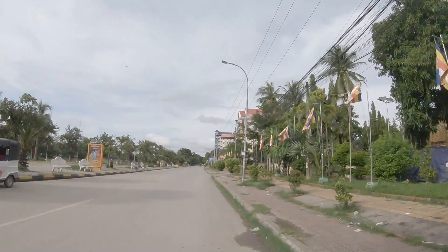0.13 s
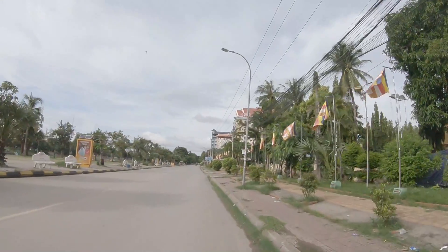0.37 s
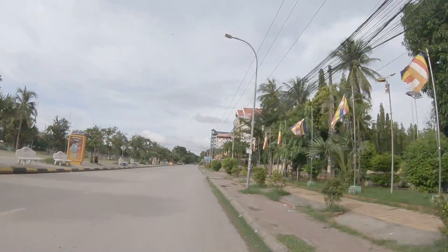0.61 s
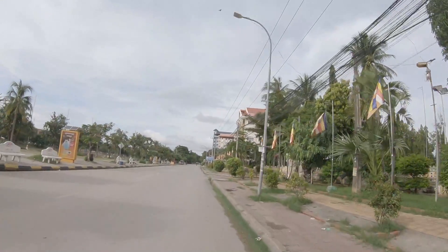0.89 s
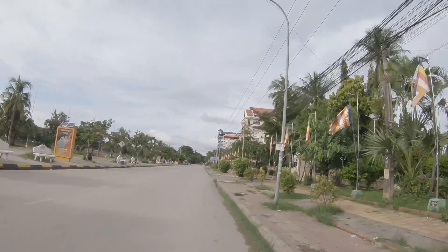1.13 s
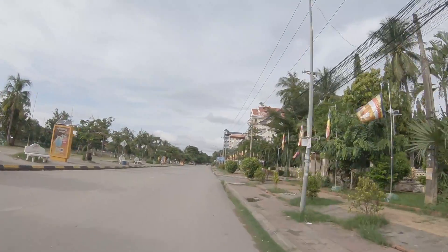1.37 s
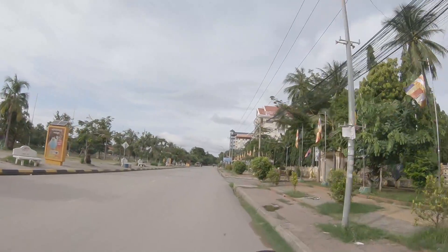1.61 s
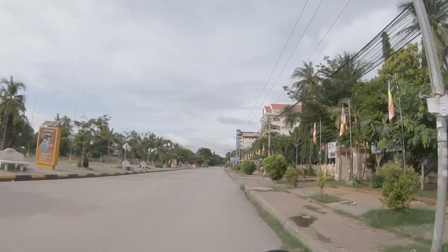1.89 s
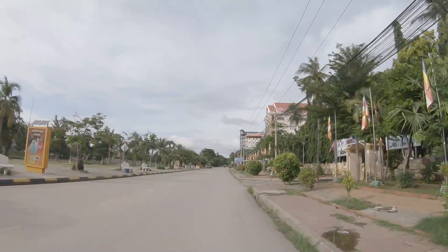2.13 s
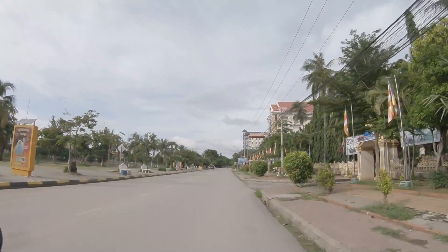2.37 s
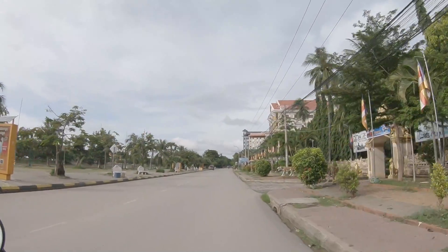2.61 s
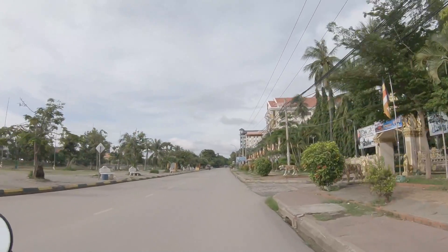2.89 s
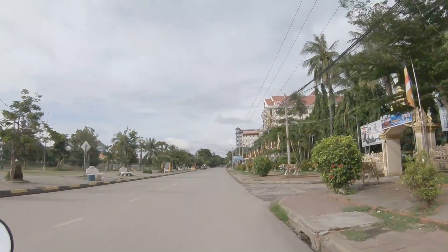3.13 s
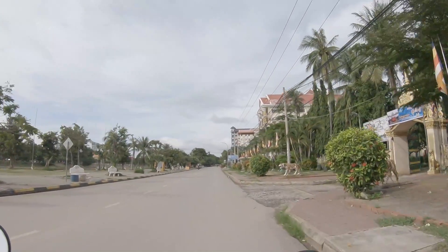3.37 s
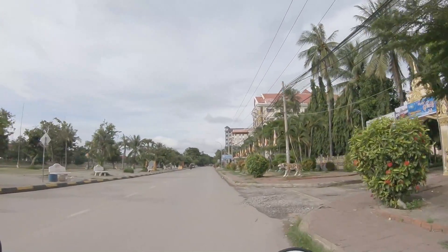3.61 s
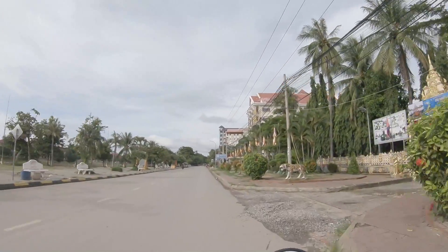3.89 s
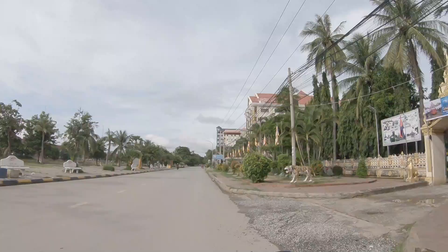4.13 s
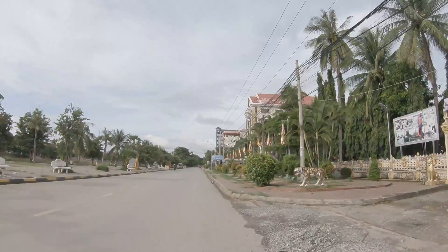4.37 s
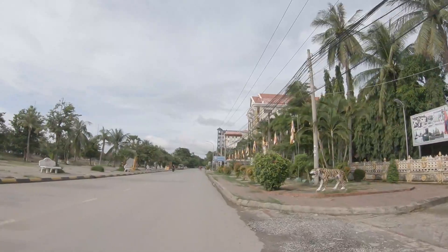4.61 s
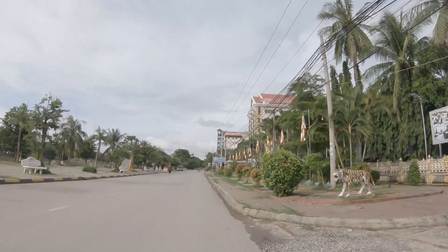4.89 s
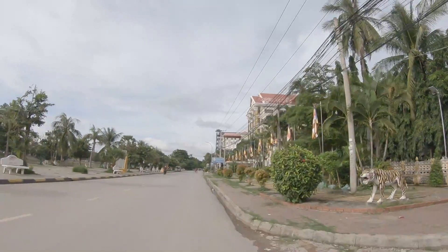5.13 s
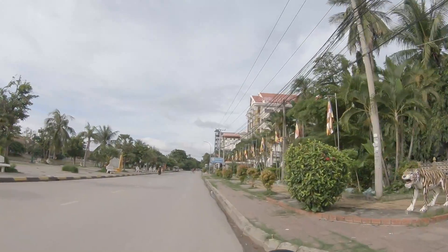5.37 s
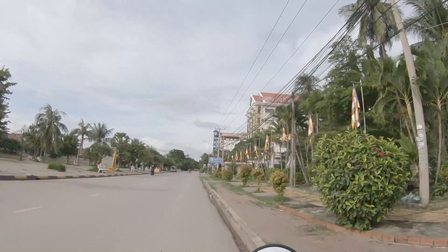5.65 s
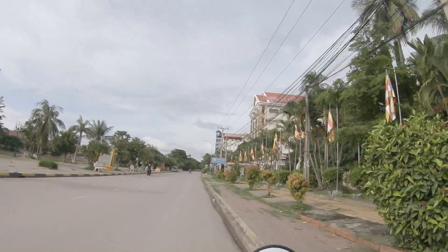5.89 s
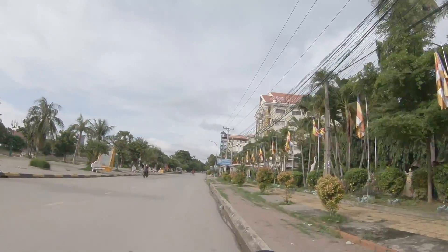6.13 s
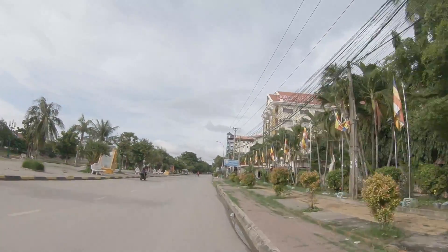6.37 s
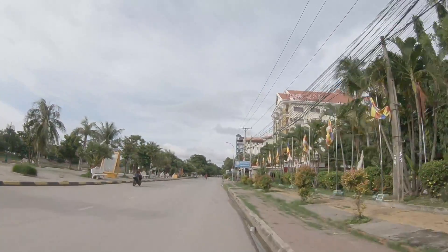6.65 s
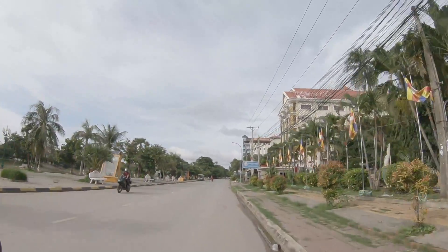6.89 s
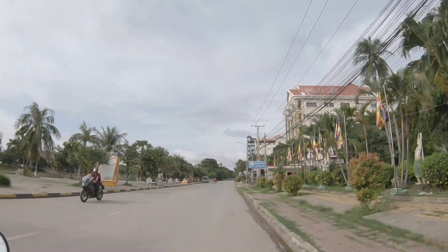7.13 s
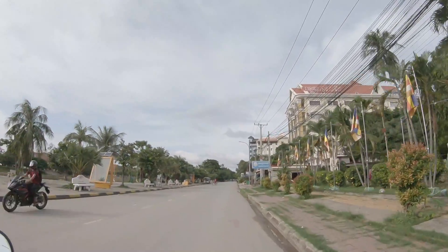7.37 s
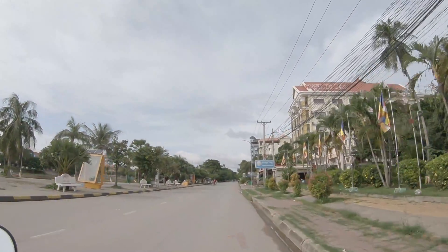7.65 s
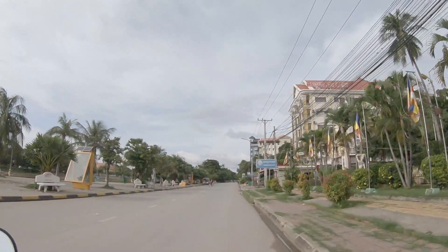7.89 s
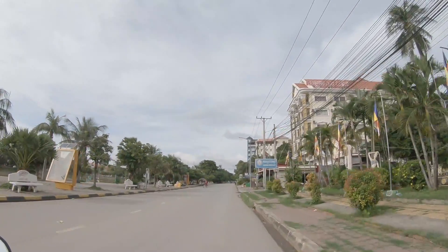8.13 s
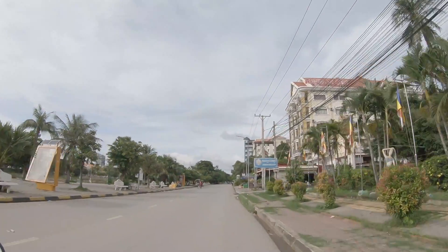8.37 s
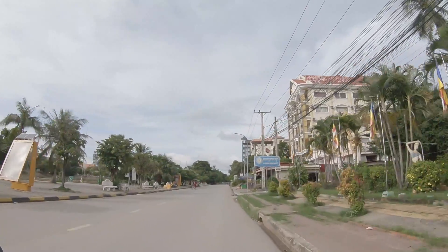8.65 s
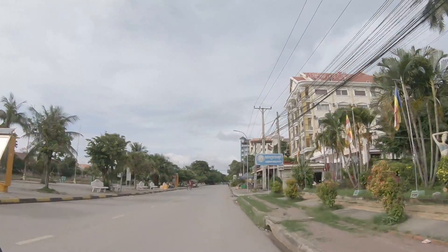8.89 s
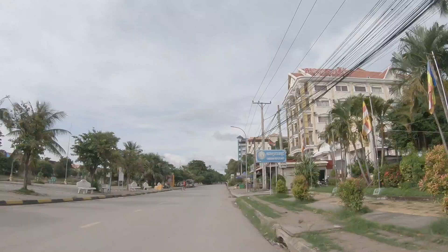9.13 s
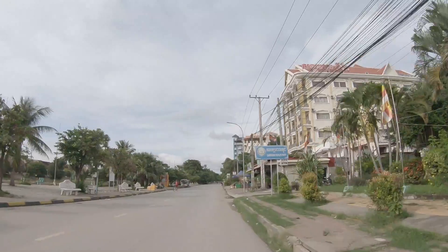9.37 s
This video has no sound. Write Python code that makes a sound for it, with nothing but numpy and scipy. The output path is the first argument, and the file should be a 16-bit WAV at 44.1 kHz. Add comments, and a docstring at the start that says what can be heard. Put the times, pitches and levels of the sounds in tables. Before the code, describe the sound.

Riding a small single-cylinder motorbike: low throbbing drone, rumbling wind gusts, rough tyre noise, and another motorbike hissing softly past late on.

```python
"""Riding a small motorcycle

A small single-cylinder four-stroke runs down a wide, quiet road, slowly gaining speed. Harmonics of the
firing rate form its exhaust drone; gears whine as smeared lines, and shaped noise makes the ticking
valves, cylinder raps and tyre roar, all of it coloured by the resonances of the frame. Gusts of noise and
single pulses buffet the microphone, two faint chirps sound, and a motorbike hisses past the other way."""
import sys
import numpy as np
from scipy import signal
from scipy.fft import rfft, irfft, next_fast_len
from scipy.io import wavfile
from scipy.ndimage import uniform_filter1d, map_coordinates

SR = 44100
rng = np.random.default_rng(int(sys.argv[2]) if len(sys.argv) > 2 else 0)


def convert_level_to_amplitude(level_db):
    """Map a level in decibels to its linear amplitude factor."""
    exponent = np.asarray(level_db, float) / 20
    return 10 ** exponent


def log_audio(samples):
    """Write samples as a 16-bit WAV file to the path given in sys.argv[1]."""
    # one column per channel
    frames = np.atleast_2d(samples).T
    # limit to full scale, then quantise
    limited = np.clip(frames, -1, 1)
    pcm = np.round(limited * 32767).astype(np.int16)
    wavfile.write(sys.argv[1], SR, pcm)


N = 419391
TIME_S = np.arange(N) / SR

# Course of the engine and its first gear pair: time_s, firing_hz, tooth_contact_hz
ENGINE_SPEED = [(0, 21.3, 627), (1, 21.5, 628.4), (2.3, 21.58, 632), (3, 21.98, 633), (4, 22.24, 640),
                (5.5, 22.62, 651), (7, 22.86, 668), (8, 22.96, 678), (9.51, 22.9, 684)]


def unit(x):
    """Normalisation to equal power: scales x to rms 1."""
    return x / np.sqrt(np.mean(x ** 2) + 1e-20)


def curves(rows):
    """Linear interpolation in time: one value per sample for each column after the time."""
    time_s, *columns = np.transpose(rows)
    return [np.interp(TIME_S, time_s, column) for column in columns]


def wobble(rate_hz):
    """Slow random modulation: a smooth curve through rate_hz random knots a second."""
    coarse = np.arange(0, N + 32, 32)
    knots = rng.standard_normal(int(N * rate_hz / SR) + 4)
    return np.interp(np.arange(N), coarse, map_coordinates(knots, [coarse * rate_hz / SR]))


def filtered(x, response):
    """Linear filtering: multiplies the spectrum of x by a complex response of frequency."""
    m = next_fast_len(N + 8192)
    return irfft(rfft(x, m) * response(np.fft.rfftfreq(m, 1 / SR)), m)[:N]


def rush(spectrum, patchy_db):
    """Turbulent noise of rms 1: a shaped spectrum whose gain varies at random over time and frequency."""
    cells = signal.stft(rng.standard_normal(N + 512), nperseg=512)[2]
    field = uniform_filter1d(rng.standard_normal(cells.shape), size=6, axis=0)
    field = uniform_filter1d(field, size=12, axis=1)
    x = signal.istft(cells * convert_level_to_amplitude(patchy_db * unit(field)), nperseg=512)[1][:N]
    f, db = np.transpose(spectrum)
    return unit(filtered(x, lambda hz: convert_level_to_amplitude(np.interp(np.log(hz + 1), np.log(f + 1), db))))


def swells(rows):
    """Superposed bell-shaped rises in dB, quicker up than down; one sum per column after the first two."""
    rise_share = 0.85  # length of the rise as a share of the fall
    total = 0
    for time_s, half_s, *db in rows:
        length_s = np.where(TIME_S < time_s, rise_share * half_s, half_s)
        total = total + np.outer(db, np.exp(-((TIME_S - time_s) / length_s) ** 2))
    return total


def with_speed(cruise_db, db_per_hz):
    """Linear dependence on engine speed: a value at cruise and its change per extra firing a second."""
    cruise_hz = 22.3
    return cruise_db + db_per_hz * (curves(ENGINE_SPEED)[0] - cruise_hz)


def once_a_cycle(cycles, at, sharp):
    """Periodic excitation: a bump of height 1 at one point of every engine cycle."""
    return np.exp(sharp * (np.cos(2 * np.pi * (cycles - at)) - 1))


def frame(x):
    """Modal resonance: the plain path plus the ringing of frame and panels."""
    # Modes of frame and panels: centre_hz, width_hz, peak_db over the plain path
    modes = [(637, 8.5, -6.5), (717, 28, -8), (835, 25, -11.5), (940, 20, -6.5), (1049, 19, -4),
             (1095, 40, -2), (1150, 34, -3.5), (1270, 31, -7), (1398, 15, -6.5), (1544, 49, -7.5),
             (1742, 39, -5.5), (1875, 24, -9), (1988, 18, -9.5), (2181, 29, -7), (4520, 200, -6),
             (8100, 74, -2)]

    def response(f):
        total = 1
        for c, w, db in modes:
            total = total + convert_level_to_amplitude(db) * 1j * f * w / (c * c - f * f + 1j * f * w)
        return total

    return filtered(x, response)


def chirps():
    """Frequency modulation under a Gaussian envelope: two short chirps, gliding down as they pass."""
    # Chirps: centre_s, peak_db, centre_hz
    chirp_rows = [(1.043, -54, 2690), (4.635, -54, 2750)]
    out, t = np.zeros(N + SR), np.arange(-1500, 1500) / SR
    for centre_s, db, hz in chirp_rows:
        chirp = np.exp(-(t / 0.014) ** 2) * np.sin(2 * np.pi * hz * t * (1 - .6 * t))
        start = round((centre_s + t[0]) * SR)
        out[start:][:len(t)] += convert_level_to_amplitude(db) * chirp
    return out[:N]


def motorbike():
    """Attenuation with distance: chain and tyre hiss, brightest from the rear, just after it passes."""
    # Chain and tyre hiss: frequency_hz, density_db (relative, per Hz)
    hiss_spectrum = [(900, -120), (2400, 4.5), (3400, -8.5), (4300, 4), (4600, 6.5), (5200, 1), (5800, 3),
                     (6150, 7.5), (6450, -1.5), (6800, -4), (9000, -11), (10200, -18), (11200, -37),
                     (13000, -120)]
    closest_s, closing_speed_m_s, gap_m, level_db = 7.5, 16, 6.8, -48.2
    rear_delay_s, shade_delay_s = .12, .37  # the rider's body then shades the sound

    def nearness(at_s):
        return np.hypot(1, (TIME_S - at_s) * closing_speed_m_s / gap_m) ** -2

    unshaded = (1 - np.tanh((TIME_S - closest_s - shade_delay_s) / .18)) / 2
    hiss = rush(hiss_spectrum, patchy_db=.7)
    top = filtered(hiss, lambda hz: np.clip((hz - 6600) / 1200, 0, 1))
    passing = nearness(closest_s) * (hiss - top) + nearness(closest_s + rear_delay_s) ** 3 * top
    return convert_level_to_amplitude(level_db + .9 * wobble(30)) * unshaded * passing


def wind():
    """Turbulent pressure on the port: eddies buffet, their edges flutter, the hardest land as thumps."""
    # Low buffeting: frequency_hz, density_db (relative, per Hz)
    buffet_spectrum = [(8, -41.5), (16, -14.5), (26, -7), (36, 2.5), (45, 2), (75, 0), (112, 1), (139, -7),
                       (170, -16), (220, -19), (370, -120)]
    # Faster edges of the eddies: frequency_hz, density_db (relative, per Hz)
    flutter_spectrum = [(40, -120), (82, -24), (140, -3), (238, -10.5), (378, -17), (600, -22.5),
                        (1200, -44), (2000, -62), (3000, -120)]
    # Gusts: centre_s, half_length_s, buffet_rise_db, flutter_rise_db
    gust_rows = [(.18, 0.04, 3, 8), (.36, 0.048, 0.5, 2.5), (.69, 0.13, 3.5, 6.5), (.88, 0.11, 9, 5.5),
                 (1.2, 0.15, 4.5, 2.5), (1.7, 0.12, 5, 3), (1.76, 0.084, 3.5, 8.5), (2.05, 0.25, 5.5, -1),
                 (2.17, 0.045, -3, 5), (2.48, 0.075, 1.5, 1.5), (3.15, 0.13, 2.5, -5),
                 (3.65, 0.11, 3.5, -1), (4.88, 0.062, 7.5, 4), (5.5, 0.13, 1.5, -2), (5.95, 0.12, 3.5, 6.5),
                 (6.3, 0.1, 1, 5), (6.6, 0.13, 5.5, 3.5), (6.95, 0.11, 4, 2), (7.2, 0.14, 3.5, 3.5),
                 (7.5, .1, 4.5, 1), (8, .1, 5.5, 1), (8.9, 0.064, 2, 2.5)]
    # Single hard eddies: centre_s, peak_db, direction (push +1 or pull -1), length_s
    thump_rows = [(.657, -19, -1, .003), (.73, -15, 1, .0028), (.85, -15, -1, .0036), (.91, -17, -1, .0036),
                  (1.696, -18, -1, .004), (1.716, -16, 1, .0048)]
    steady_buffet_db, steady_flutter_db, eddy_swing_db = -28.5, -38.5, 0.4
    ragged = .1  # dB of quick tearing per dB of gust

    buffet_db, flutter_db = swells(gust_rows) + eddy_swing_db * wobble(8.7)
    buffet_level = convert_level_to_amplitude(steady_buffet_db + buffet_db + 0.87 * wobble(20))
    buffet = buffet_level * rush(buffet_spectrum, patchy_db=0.0)
    flutter_level = convert_level_to_amplitude(steady_flutter_db + flutter_db * (1 + ragged * wobble(35)))
    lumps = convert_level_to_amplitude(1.7 * wobble(28))
    flutter = flutter_level * unit(lumps * rush(flutter_spectrum, patchy_db=0.0))
    thumps = np.zeros(N)
    for centre_s, db, sign, length_s in thump_rows:
        u = (TIME_S - centre_s) / length_s
        thumps += sign * convert_level_to_amplitude(db) * (1 - u ** 2) * np.exp(-u ** 2 / 2)
    return buffet + flutter + thumps


def tyres(cycles):
    """Contact noise and cavity resonance: rubber roars on coarse tar, the hollow tyre booms in a narrow band."""
    # Roar of the tread: frequency_hz, density_db (relative, per Hz)
    roar_spectrum = [(240, -32.5), (400, -3), (628, 0), (874, -4), (1050, -5), (1330, -8.5), (1460, -7.5),
                     (2150, -15.5), (3220, -26), (3600, -29.5), (4680, -50), (7920, -120)]
    # Boom of the hollow tyre: frequency_hz, density_db (relative, per Hz)
    boom_spectrum = [(200, -120), (400, -32.5), (480, 2.5), (560, 2.5), (620, 7), (760, -24), (1400, -120)]
    # Patches of rougher or smoother tar: centre_s, half_length_s, boom_rise_db, roar_rise_db
    patch_rows = [(.05, 0.21, 7.5, 2), (.6, 0.22, 11, 1.5), (1.05, 0.28, 3.5, 0), (3.3, 0.2, 16.5, 0.5),
                  (3.95, .12, 11, -0.5), (4.3, .1, 7, 0.5), (4.75, .3, 9, -0.5), (5.4, 0.27, 14.5, 0),
                  (5.92, 0.13, 3.5, -0.5), (7.5, 0.18, 2.5, -1), (8.2, 0.24, 8, -1), (9.15, 0.53, 15, 0)]
    quiet_boom_db = -57.5

    throb = 1 + 0.14 * once_a_cycle(cycles, at=0.043, sharp=3.5)  # each firing jolts the tyre
    boom_db, roar_db = swells(patch_rows)
    flicker_db = (0.4 + 0.11 * np.abs(roar_db)) * wobble(30)
    roar_level = convert_level_to_amplitude(with_speed(-41, 1.7) + roar_db + 0.2 * wobble(3.5) + flicker_db)
    roar = roar_level * unit(throb * rush(roar_spectrum, patchy_db=-0.2))
    boom_level = convert_level_to_amplitude(quiet_boom_db + boom_db + .8 * wobble(30))
    return roar + boom_level * rush(boom_spectrum, patchy_db=0.5)


def knock(cycles):
    """Impact excitation: each firing raps the cylinder with a short burst, each of its own strength."""
    # Ringing of the cylinder: frequency_hz, density_db (relative, per Hz)
    cylinder_spectrum = [(900, -120), (1600, -30), (2000, -9), (2170, 0), (2330, -14), (2900, -20),
                         (3300, -36), (5000, -120)]
    # How hard the firings rap: time_s, rap_db
    rap_rows = [(0, -3), (.9, -2.5), (1.35, 2.5), (1.7, -2), (2.8, 1), (3.4, 0.5), (4.3, 1), (4.6, -7),
                (5, -1), (6, 1), (7.3, 2), (8.8, 2), (9.51, -7)]
    rap = once_a_cycle(cycles, at=0, sharp=1.5) * convert_level_to_amplitude(1.2 * wobble(22))
    level = convert_level_to_amplitude(with_speed(-64, -6.5) + curves(rap_rows)[0])
    return level * unit(rap * rush(cylinder_spectrum, patchy_db=-1.0))


def clatter(cycles):
    """Periodically modulated noise: chain and valve hiss, ticking at each firing and at the quarter cycles."""
    # Chain and valve hiss: frequency_hz, density_db (relative, per Hz)
    clatter_spectrum = [(1000, -120), (1800, -21.5), (3000, -6), (3350, -9), (3700, 2.5), (4100, 1),
                        (4500, 1.5), (5400, 1), (6000, -1), (7000, -9), (8400, -10), (9500, -22.5),
                        (11200, -36.5), (11700, -35.5), (13500, -120)]
    # Faint topmost fizz: frequency_hz, density_db (relative, per Hz)
    fizz_spectrum = [(9000, -120), (11500, -4.5), (12100, 5), (13500, 4), (15000, -3.5), (15900, -12)]
    # Spells of fizz: start_s, end_s, level_db, fade_s
    spell_rows = [(-.5, .72, -83.5, .05), (3.4, 6.08, -82.5, .1), (3.2, 10, -91, .1), (8.45, 11, -80, .25),
                  (9.2, 11, -79, .15)]

    def fade(at_s, fade_s):
        return (1 + np.tanh((TIME_S - at_s) / fade_s)) / 2

    spells = np.zeros(N)
    for start_s, end_s, db, fade_s in spell_rows:
        spells += convert_level_to_amplitude(db) * (fade(start_s, fade_s) - fade(end_s, fade_s))
    tick = once_a_cycle(cycles, at=0, sharp=6.4) * convert_level_to_amplitude(1.1 * wobble(22))
    valves = once_a_cycle(4 * cycles, at=0, sharp=0.44) * convert_level_to_amplitude(5.3 * wobble(60))
    hiss = rush(clatter_spectrum, patchy_db=0.9)
    bright = filtered(hiss, lambda hz: np.clip((hz - 6000) / 2500, 0, 1))  # the ticks show most in the top
    body = unit(hiss * (1 + .35 * tick + 0.2 * valves) + bright * (0.34 * tick + 0.12 * valves))
    fizz = unit(rush(fizz_spectrum, patchy_db=1.5) * (1 + .8 * tick))
    return convert_level_to_amplitude(with_speed(-54.5, 1.4) + 0.16 * wobble(10)) * body + spells * fizz


def gears(cycles):
    """Tooth-mesh tones: contacts sing smeared lines, jolted by the torque kick of each firing."""
    # Gear pairs: ratio to the first pair's contact rate, cruise_db, db_per_hz of firing rate, smear_hz,
    # steady (clean part against smear, at cruise), steady_per_hz of firing rate
    pair_rows = [(.998, -50.5, 1.9, 65, .65, .4), (1.66, -57.5, 0, 110, .45, -.3),
                 (2.23, -57.5, 5.5, 55, .9, .7)]
    # Load on the gears: time_s, load_db
    load_rows = [(0, 4), (.6, -8), (1.2, -10.5), (2, -14), (2.7, 0), (3.6, 2), (4.2, 4), (5.6, 1.5),
                 (6.3, -1), (7.1, -5), (7.6, 1.5), (8.1, 4.5), (8.8, 5), (9.51, 4)]
    load_shares = (1.36, .2, 0.2)  # how far each pair follows the load
    waver_db = 0.5

    kick = 1 + .25 * once_a_cycle(cycles, at=0.25, sharp=1.3)
    mesh_hz, load_db = curves(ENGINE_SPEED)[1], curves(load_rows)[0]
    out = np.zeros(N)
    for (ratio, cruise_db, db_per_hz, smear_hz, steady, steady_per_hz), share in zip(pair_rows, load_shares):
        phase = 2 * np.pi * ratio * np.cumsum(mesh_hz) / SR
        in_phase = with_speed(steady, steady_per_hz) + wobble(smear_hz)
        line = np.sin(phase) * in_phase + np.cos(phase) * wobble(smear_hz)
        level = convert_level_to_amplitude(with_speed(cruise_db, db_per_hz) + share * load_db + waver_db * wobble(1.5))
        out += level * unit(line * kick)
    return out


def exhaust(cycles):
    """Fourier synthesis: phase-locked harmonics of the firing rate sum to one throb per firing."""
    # Exhaust notes: multiple of the firing rate, cruise_db, db_per_hz of firing rate
    note_rows = [(2, -38, 1.5), (3, -42, 1), (4, -39, 2), (5, -32.5, 1.2), (6, -34.5, -1), (7, -51, -4),
                 (8, -56, -1), (9, -57, -2)]
    # Throttle: time_s, throttle_db
    throttle_rows = [(0, 1.5), (1, -4), (2, 0.5), (3.4, -0.5), (4.8, -0.5), (6.2, 0.5), (7.2, -3),
                     (8.4, -1), (9.51, -1.5)]
    waver_db, surge_db = .5, 1.2  # each note swells and sinks on its own, slowly and quickly

    timing = cycles + 0.013 * wobble(9)  # firings come a little early or late
    throttle_db = curves(throttle_rows)[0]
    out = np.zeros(N)
    for k, cruise_db, db_per_hz in note_rows:
        lag = .3 * k * k  # the silencer spreads the blow into a ringing burst
        drift_db = waver_db * wobble(1.1) + surge_db * wobble(7)
        level = convert_level_to_amplitude(with_speed(cruise_db, db_per_hz) + throttle_db + drift_db)
        out += np.sqrt(2) * level * np.cos(2 * np.pi * k * timing - lag + 0.2 * wobble(4.6))
    return out * convert_level_to_amplitude(1.0 * wobble(22))  # no two charges burn alike


def scene():
    """Superposition: all that engine and road shake passes through the frame; the rest adds directly."""
    cycles = np.cumsum(curves(ENGINE_SPEED)[0]) / SR + 0.734
    shaken = frame(tyres(cycles) + knock(cycles) + clatter(cycles) + gears(cycles))
    return (chirps() + motorbike() + wind() + shaken + exhaust(cycles))[None]


def roll_off(x):
    """The treble ends steeply here."""
    return signal.sosfilt(signal.butter(12, 15750, fs=SR, output="sos"), x)


def record(dry):
    """Dynamic compression and saturation: gain leans back after loud gusts, the preamplifier rounds peaks."""
    ride, memory_s = 0.22, 0.16  # dB pulled down per dB of loudness; time constant of the loudness
    keep, power = np.exp(-1 / (memory_s * SR)), np.mean(dry ** 2)
    loudness = signal.lfilter([1 - keep], [1, -keep], dry ** 2 - power) / power + 1  # starts at the average
    ridden = dry * np.abs(loudness) ** (-ride / 2)
    rounded = ridden / (1 + np.abs(ridden / .4) ** 4) ** (1 / 4)
    return roll_off(rounded)


dry = scene()
out = record(dry)
log_audio(out)
```